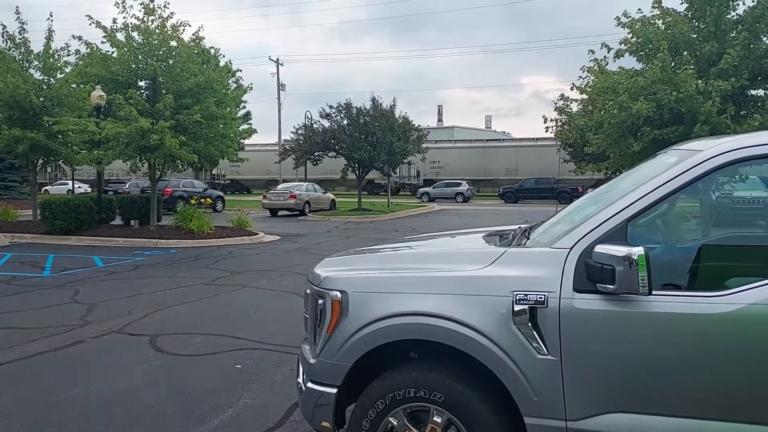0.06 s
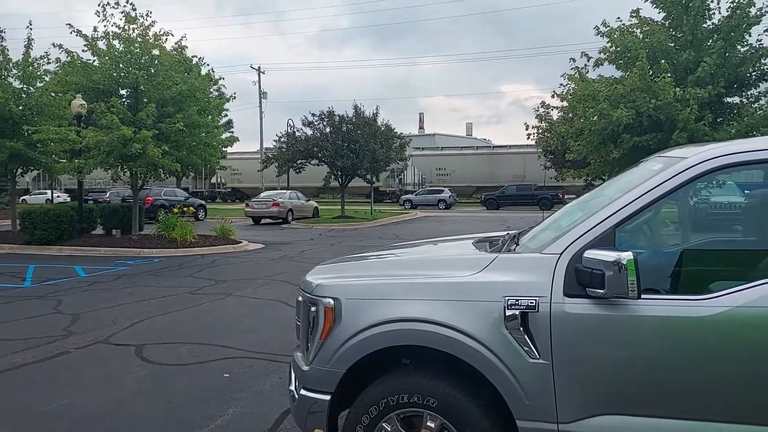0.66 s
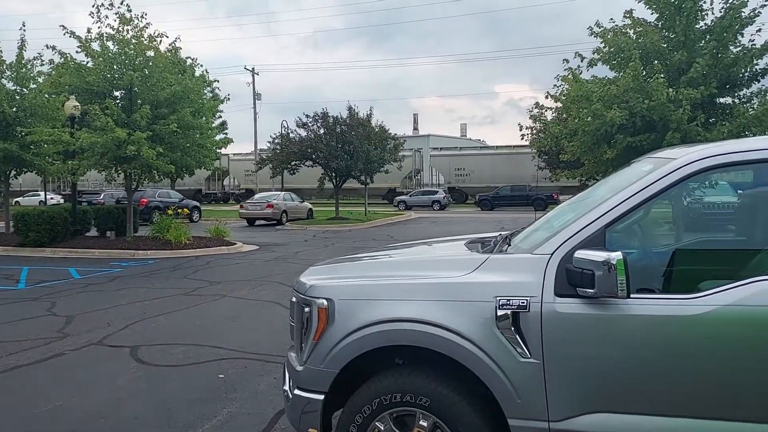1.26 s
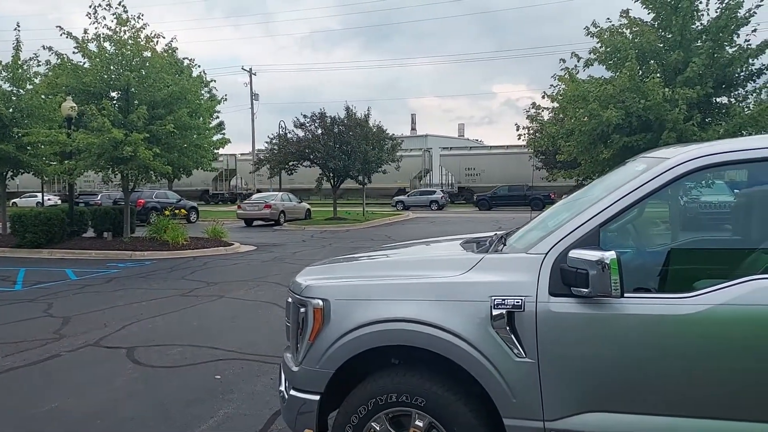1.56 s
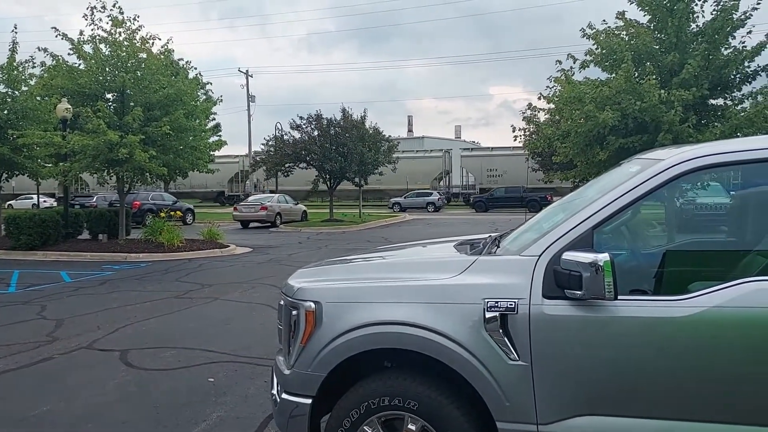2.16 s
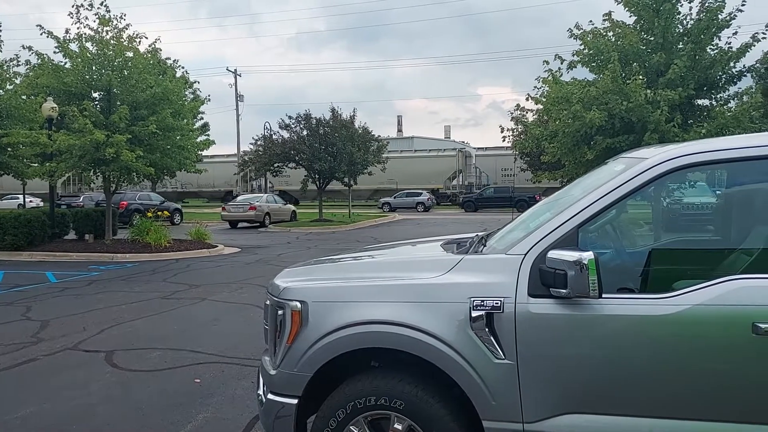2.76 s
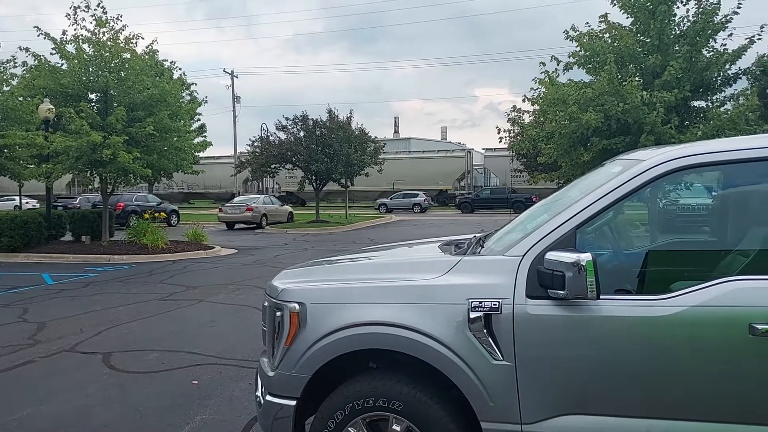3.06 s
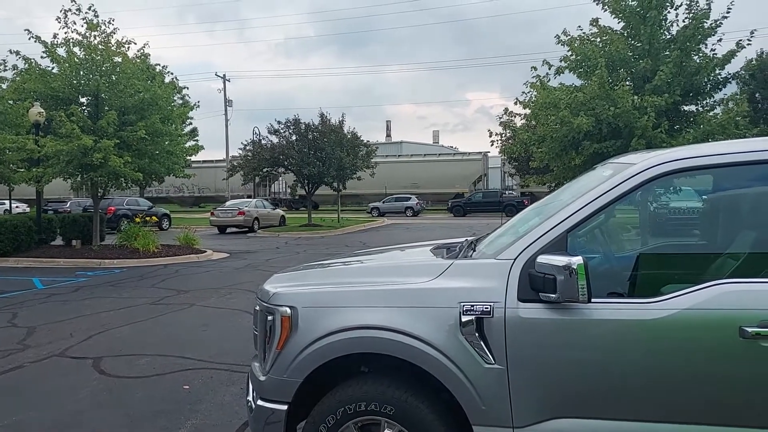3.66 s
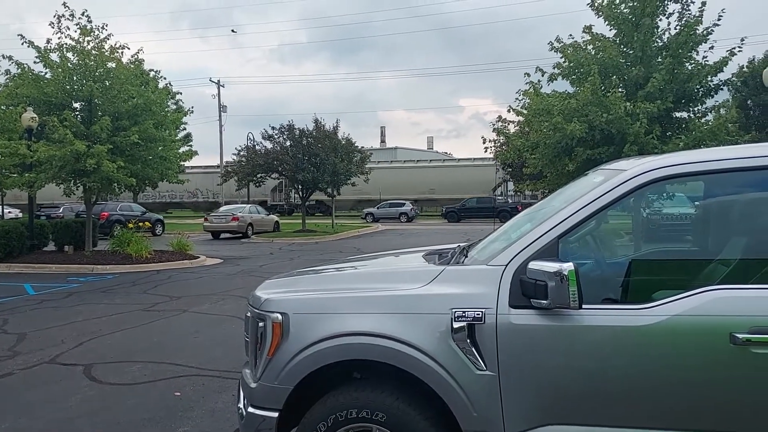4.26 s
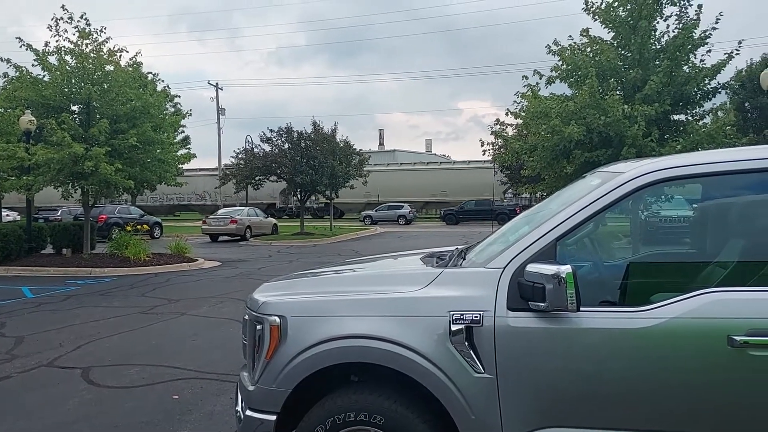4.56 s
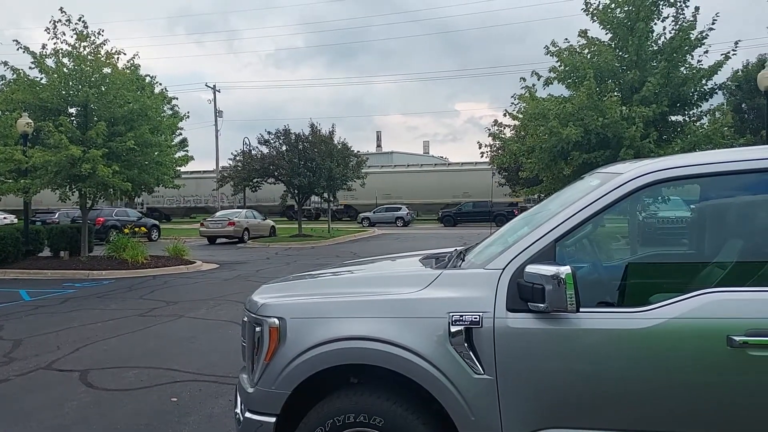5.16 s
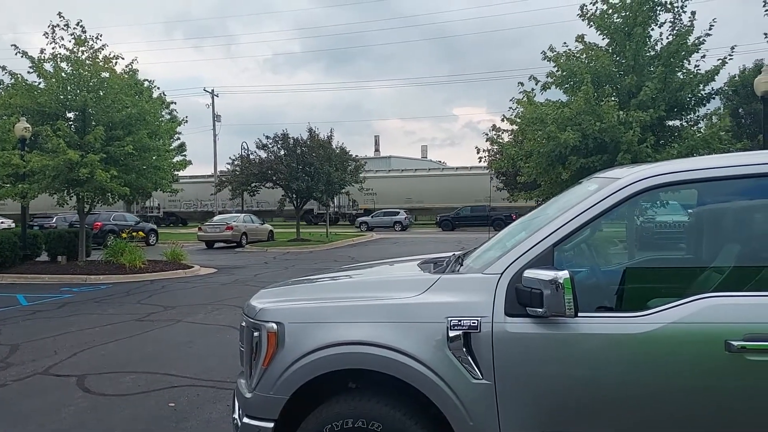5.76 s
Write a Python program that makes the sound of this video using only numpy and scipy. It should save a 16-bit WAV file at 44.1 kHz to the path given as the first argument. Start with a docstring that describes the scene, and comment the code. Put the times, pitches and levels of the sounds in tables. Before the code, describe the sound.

High, wavering wheel squeals come and go over the steady rumble of freight wagons passing beyond a car park.

```python
"""Wagons rumble and wheel flanges squeal as a freight train rolls by, heard from across a car park.
Two distant engine drones beat against each other. The flanges stick and slip on the rail, and their
wavering tones scatter off cars and buildings on the way to the stereo microphone. A thin hiss swells
and fades, with a few scuffs; later an insect ticks in the trees and loose metal clinks."""
import sys
import numpy as np
from scipy import signal
from scipy.fft import rfft, irfft
from scipy.io import wavfile
from scipy.ndimage import uniform_filter1d

SR = 44100
rng = np.random.default_rng(int(sys.argv[2]) if len(sys.argv) > 2 else 0)


def pcm_store(signal):
    """Save signal as 16-bit PCM."""
    levels = np.round(np.clip(np.atleast_2d(signal), -1, 1) * 32767)
    wavfile.write(sys.argv[1], SR, levels.astype(np.int16).T)


N = 256206
TIME = np.arange(N) / SR
FREQS = np.maximum(np.fft.rfftfreq(N, 1 / SR), 1)

# Wagons passing. Each row: time in seconds, then relative dB of body rumble, rail roar and wheel ring.
WAGON_LEVELS = [(0.0, -29, -51, -44.5), (0.05, -34.5, -45.5, -44.5), (0.94, -36, -45, -44.5),
                (1.15, -33.5, -44.5, -43.5), (2.1, -33.5, -42.5, -42.5), (3.19, -33, -46.5, -44.5),
                (3.75, -34, -42.5, -45), (4.22, -33, -47, -45.5), (4.27, -35, -47, -47.5),
                (4.95, -33, -45, -46), (5.53, -33.5, -42.5, -42), (5.81, -32.5, -40.5, -44)]
# Wagons knocking. Each row: start in seconds, peak in dB.
WAGON_KNOCKS = [(.62, -36), (1.265, -36), (3.65, -52), (4.655, -37)]
# The colours of the noises. Each row: frequency in Hz, relative spectral density in dB.
RUMBLE_COLOUR = [(20, -29), (35, -8.5), (50, -5), (64, 8.5), (100, 0), (125, 0), (165, -4), (225, 0.5),
                 (265, -1), (305, -2), (345, -6.5), (390, -10), (450, -10.5), (600, -30)]
ROAR_COLOUR = [(330, -33), (520, -1), (750, -0.5), (830, -5), (920, -5.5), (1010, -14.5), (1300, -32)]
RING_COLOUR = [(900, -12), (1100, -1.5), (1300, 2.5), (1410, -1), (1600, 0), (1920, 3), (2120, -0.5),
               (2330, -5), (2600, 0.5), (3200, -1.5), (3800, -31.5), (6000, -47)]
HISS_LOW_COLOUR = [(2400, 5.5), (3600, 9), (4300, 5.5), (4950, 5.5), (5900, 2.5), (7200, -7), (8400, -10),
                   (10000, -24)]
HISS_TOP_COLOUR = [(6000, 8), (8400, 5.5), (9400, 6.5), (10300, 3.5), (11300, 3.5), (12200, 3), (13700, 7),
                   (15700, -0.5)]
SCUFF_COLOUR = [(2000, -38), (3800, -22), (4400, 14), (4950, 11), (5400, -24), (6300, -6), (7500, -14),
                (15000, -9)]
GRIND_COLOUR = [(2700, -32), (2880, 8), (3050, -15), (3190, 12.5), (3290, -44), (3460, -29), (5200, -27),
                (5750, -9), (6400, -38), (7000, -39)]

# The two engines. Each row: time in seconds, relative dB of the main drone and of the second.
ENGINE_LEVELS = [(0, -44, -28), (.35, -25, -54), (.62, -25.5, -54), (.88, -35.5, -55), (1.25, -26, -58),
                 (1.53, -43, -49), (1.83, -31.5, -59), (2.25, -34, -46), (2.65, -25, -27.5),
                 (3.0, -29.5, -37), (3.36, -21, -37), (3.97, -28.5, -28), (4.3, -34, -40), (5.45, -22, -35),
                 (5.8, -31.5, -31)]
# The second engine hunts, so the beat quickens and slows. Each row: time in seconds, pitch in Hz.
HUNTING_PITCH = [(0, 84.7), (1.0, 84.5), (1.7, 83.3), (2.85, 84.6), (3.4, 84.1), (4.3, 84.95), (5.8, 84.2)]

# The wheels that sing. Each row: natural pitch in Hz, faint level between squeals in dB,
# rasp in dB against the mean of tone and octave, left minus right in dB.
SINGING_WHEELS = [(2650, -57, -23, 4), (2810, -49.5, -22.5, 0.5), (3130, -54.5, -25, 9)]
# A flange catches the rail. Each row: start and end in seconds; pitch, glide, mid-squeal bend and
# waver in Hz; level, change of level and octave level in dB.
FLANGE_CATCHES = [(-.05, 0.065, 2697, 11.5, -5, 11.7, -36.5, 5, -43),
                  (-.03, 0.219, 2790, 69, 14.5, 18.8, -41.5, 1, -44),
                  (0.277, 0.462, 2798, -24, 0, 6, -34.5, 0, -42.5),
                  (0.481, 0.673, 2784, 9, -0.5, 8.1, -37, 7, -38.5),
                  (.47, 0.59, 3160, -100, 9, 38, -33.5, 7, -63),
                  (0.71, 0.868, 2835, -31, 0, 11.4, -37, 0, -39),
                  (0.879, 1.02, 2895, 59.5, 1, 51, -39.5, -10, -49),
                  (0.661, 1.02, 3190, 218.5, -39.5, 71, -48.5, -2, -72),
                  (1.021, 1.198, 3190, -260, -10, 43.1, -43, 11, -73),
                  (1.163, 1.477, 2770, -9.5, -5.5, 8.5, -43.5, 0, -50),
                  (1.203, 1.396, 3095, -0.5, 0, 25.4, -42.5, 7, -68),
                  (1.551, 1.703, 2806, 29.5, 13, 3.1, -32, 0, -40),
                  (1.704, 2.039, 2800, -61.5, 34.5, 42.3, -40, -12, -49.5),
                  (1.727, 2.344, 3070, -45.5, -15.5, 31, -41.5, -9, -64),
                  (2.073, 2.32, 2690, 0.5, -38, 19, -36, 7, -49),
                  (2.342, 2.554, 2765, 1, 51.5, 5.4, -27, 8, -40.5),
                  (2.502, 2.65, 3095, 51, -0.5, 18.7, -36.5, -7, -57),
                  (2.553, 2.76, 2825, 16, 4.5, 24, -37, -7, -38.5),
                  (2.741, 3.064, 3147, 1.5, 0, 34, -41, 8, -76),
                  (2.829, 3.034, 2768, -29, -4.5, 8.1, -33, -4, -45.5),
                  (2.943, 3.2, 2685, -1, -15.5, 12.7, -37, 16, -56),
                  (3.181, 3.586, 2805, 1.5, 10, 10.4, -38, -10.5, -46.5),
                  (3.66, 3.927, 3136, -42, 3, 29, -43, 10, -78),
                  (3.964, 4.144, 2668, 30.5, -43, 10.7, -41, -4, -53),
                  (4.115, 4.504, 2825, 130.5, -25.5, 39.46, -41, 2.5, -50),
                  (4.221, 4.504, 3125, -17, 111, 70.4, -34, 1.5, -56),
                  (4.601, 5.0, 2822, 4, -9, 10.4, -42, -4, -50.5),
                  (4.611, 5.137, 3150, -18, 0.5, 43.9, -40.5, -2, -61),
                  (5.036, 5.361, 2828, 8, 1, 9.3, -39.5, -5, -45.5),
                  (5.198, 5.499, 3100, -61, -3.5, 29, -36, -12.5, -52.5),
                  (5.559, 5.904, 2658, -0.5, 1.5, 14, -37, 6, -54),
                  (5.62, 5.897, 3088, 13.5, 3.5, 23.1, -38.5, 5.5, -58)]
# A squeal's upper overtones. Each row: multiple of the pitch, relative level in dB, extra waver in Hz.
RASP_OVERTONES = [(3, -0.5, 78), (4, -2.5, 88), (5, -8, 60)]
# Swells of hiss. Each row: start, end and attack in seconds, relative dB of the low and top bands.
HISS_SWELLS = [(-.05, 0.656, .02, -48, -62), (0.653, .98, .05, -53.5, -63),
               (1.001, 1.526, 0.093, -51.5, -60), (1.546, 1.859, 0.15, -47, -52.5),
               (1.88, 2.126, 0.049, -55, -64), (2.357, 2.53, 0.0036, -50, -54),
               (2.877, 3.557, .08, -51, -60.5), (3.12, 3.28, 0.066, -51, -57), (4.29, 4.323, .03, -56, -51),
               (4.616, 4.93, 0.035, -55, -68), (5.365, 5.9, 0.038, -46.5, -59)]
# Short scuffs. Each row: start in seconds, peak in dB.
SCUFF_PEAKS = [(.03, -35), (.18, -41), (4.003, -56), (4.321, -43)]
# Brief squeaks. Each row: centre in seconds, pitch in Hz, level in dB, octave level in dB.
FLANGE_TOUCHES = [(0.691, 2540, -38, -66), (1.489, 2500, -39, -66), (2.079, 3320, -41, -66),
                  (2.955, 2624, -31, -41), (3.16, 2610, -34.5, -49), (4.04, 3730, -45, -70),
                  (5.022, 2480, -40, -64)]
# A flange grinds hard. Each row: start and end in seconds, level in dB.
FLANGE_GRINDS = [(.78, 1.05, -44.5), (1.72, 1.911, -57), (2.583, 3.255, -41.5), (4.28, 4.482, -35),
                 (4.704, 4.951, -40), (4.968, 5.329, -37)]
# The insect's ticks. Each row: start in seconds, peak in dB.
WING_STROKES = [(3.69, -37), (3.713, -39), (4.235, -47), (4.258, -45), (5.464, -42), (5.485, -40)]
# Loose metal clinking. Each row: start in seconds, strength in dB.
METAL_HITS = [(5.38, -43.5), (5.41, -48), (5.455, -45), (5.492, -40.5), (5.551, -40.5), (5.571, -44.5),
              (5.603, -41.5), (5.635, -38.5), (5.722, -37.5), (5.748, -50)]
# The metal's modes. Each row: frequency in Hz, gain in dB, seconds to die away by 60 dB.
METAL_MODES = [(3675, -17, 0.07), (4710, 6, 0.03), (4910, 3.5, 0.06), (5270, 1, 0.055), (5150, -2, .08),
               (5900, -7, .09), (5800, -6.5, 0.39), (6240, -16, 0.11), (6630, -5, 0.15), (8480, -13, 0.11),
               (9150, -14, 0.17), (10000, -19, 0.086), (10680, -17, 0.11), (14600, -10, .04)]

# Noise at the microphone. Each row: frequency in Hz, left-right correlation from 0 to 1.
STEREO_LIKENESS = [(30, 1), (60, 0.4), (130, 1), (290, 0.83), (640, 0.34), (1400, 0.14), (3000, 0)]
# The side that noise leans to. Each row: frequency in Hz, left minus right in dB.
STEREO_BALANCE = [(60, -3.5), (110, 0), (200, 0), (380, -0.5), (700, 2.5), (1290, 5), (2380, 3.5),
                  (4400, 3), (8120, 0), (15000, 0.5)]
# The microphone's ports. Each row: frequency in Hz, radians by which left leads.
MIC_PORT_PHASE = [(25, -0.35), (75, -0.91), (130, -1.16), (250, 0.081)]


def from_db(db):
    """Decibels to gain."""
    return 10 ** (np.asarray(db) / 20)


def to_db(power):
    """Power to decibels."""
    return 10 * np.log10(power + 1e-12)


def unit_rms(x):
    """Scale to unit rms."""
    return x / np.sqrt(np.mean(x ** 2) + 1e-20)


def over_time(rows):
    """Each column of a timed table, read at every sample."""
    times, *columns = np.transpose(rows)
    return [np.interp(TIME, times, column) for column in columns]


def over_hz(points):
    """A table read along a log-frequency axis."""
    hz, value = np.transpose(points)
    return np.interp(np.log(FREQS), np.log(hz), value)


def panned(left_db):
    """Left and right gains for a level difference."""
    return from_db(np.array([[.5], [-.5]]) * left_db)


def drift(rate_hz):
    """A random wander of unit rms, mostly slower than the given rate."""
    return unit_rms(irfft(rfft(rng.standard_normal(N)) / (1 + (FREQS / rate_hz) ** 4), N))


def noise(colour):
    """Coloured stereo noise, alike on both sides only in the bass, falling steeply outside its table."""
    mid, side = rfft(rng.standard_normal((2, N)))
    alike = over_hz(STEREO_LIKENESS)
    pair = np.sqrt(1 + alike) * mid + np.sqrt(1 - alike) * side * [[1], [-1]]
    edges = np.minimum(1, FREQS / colour[0][0]) ** 4 * np.minimum(1, colour[-1][0] / FREQS) ** 4
    return unit_rms(irfft(pair * edges * from_db(over_hz(colour)) * panned(over_hz(STEREO_BALANCE)), N))


def bursts(events, rise_s, decay_s):
    """One envelope that jumps and dies away at each event."""
    out = np.zeros(N)
    for start, level_db in events:
        age = np.maximum(TIME - start, 0)
        decay = np.exp(-np.clip((age - rise_s) / decay_s, 0, 20))
        out += from_db(level_db) * np.minimum(age / rise_s, 1) * decay
    return out


def swell(start, end, attack_s, release_s):
    """Attack, hold and release with rounded corners."""
    return (1 + np.tanh((TIME - start) / attack_s)) * (1 + np.tanh((end - TIME) / release_s)) / 4 + 1e-9


def wagons():
    """Beyond the car park, rough wheels shake the wagon bodies, the rails and the wheels themselves."""
    rumble_db, roar_db, ring_db = over_time(WAGON_LEVELS)
    knocks = bursts(WAGON_KNOCKS, rise_s=0.006, decay_s=0.006)
    rumble = from_db(rumble_db + 4.0) * noise(RUMBLE_COLOUR)
    roar = (from_db(roar_db + 2.0 + 1.45 * drift(9.8)) + knocks) * noise(ROAR_COLOUR)
    ring = from_db(ring_db + 4.5 + 0.78 * drift(10)) * noise(RING_COLOUR)
    return rumble + roar + ring


def drone(hz, level_db, crest_s):
    """An exhaust note from afar: only the firing tone reaches the microphone."""
    turns = np.cumsum(hz * np.ones(N)) / SR
    turns -= np.interp(crest_s, TIME, turns)
    return from_db(level_db) * np.sqrt(2) * np.cos(2 * np.pi * turns)


def engines(main_hz=74.8, in_step_s=3.335):
    """One engine holds its speed; a second, about ten hertz higher, throbs against it."""
    main_db, second_db = over_time(ENGINE_LEVELS)
    second_hz, = over_time(HUNTING_PITCH)
    both = drone(main_hz, main_db, in_step_s) + drone(second_hz, second_db, in_step_s)
    return from_db(-1.03) * both * panned(-2.8)


def scattered(tone, t60_s, echo_db):
    """Echoes off cars and buildings make a wavering tone flutter; its slow level stays at 1."""
    age = TIME[:SR // 2]
    paths = rng.standard_normal((2, len(age))) * from_db(-60 * age / t60_s)
    paths *= from_db(echo_db) / np.sqrt(np.sum(paths ** 2, axis=1, keepdims=True))
    paths[:, 0] += 1  # the direct path
    heard = signal.oaconvolve(tone[None], paths, axes=1)[:, :N]
    return heard / np.sqrt(uniform_filter1d(heard ** 2, size=SR // 10, axis=1) + 1e-6)


def wheel_curves(catches, faint_db, octave_growth_db=6.5):
    """Pitch, waver, level and octave level of one wheel, which sings on faintly between squeals."""
    grip = pitch = waver = 0
    power, octave_power = from_db(faint_db) ** 2, from_db(faint_db - 18) ** 2
    for start, end, hz, glide_hz, bend_hz, waver_hz, level_db, change_db, octave_db in catches:
        held = swell(start, end, attack_s=0.022, release_s=0.04) ** 2
        progress = np.clip((TIME - start) / (end - start), 0, 1) - .5  # zero in mid-squeal
        grip += held
        pitch += held * (hz + glide_hz * progress + bend_hz * np.cos(np.pi * progress))
        waver += held * waver_hz
        power += held * from_db(level_db + change_db * progress) ** 2
        octave_power += held * from_db(octave_db + (change_db + octave_growth_db) * progress) ** 2
    return pitch / grip, waver / grip, to_db(power), to_db(octave_power)


def stick_slip(hz, waver_hz, level_db, octave_db, rasp_db, left_db):
    """Stick-slip drives one wheel mode; its pitch wavers, and its upper overtones blur into a rasp."""
    phase = 2 * np.pi * np.cumsum(hz + waver_hz * drift(140) + 5 * drift(22)) / SR
    tones = [(from_db(level_db) * panned(left_db), phase), (from_db(octave_db) * panned(-1.2), 2 * phase)]
    for multiple, overtone_db, blur_hz in RASP_OVERTONES:
        blur = 2 * np.pi * np.cumsum(blur_hz * drift(200)) / SR
        flare_db = 3 * drift(10)
        gain = from_db((level_db + octave_db) / 2 + rasp_db + overtone_db + flare_db)
        tones.append((gain, multiple * phase + blur))
    partials = sum(gain * scattered(np.sin(angle), t60_s=0.26, echo_db=3) for gain, angle in tones)
    return partials * from_db(2.0 * drift(40))


def squeals():
    """Each time a flange catches the rail, the wheel nearest in pitch sings."""
    out = np.zeros((2, N))
    natural_hz = np.array(SINGING_WHEELS)[:, 0]
    for wheel, (_, faint_db, rasp_db, left_db) in enumerate(SINGING_WHEELS):
        catches = [row for row in FLANGE_CATCHES if np.argmin(abs(natural_hz - row[2])) == wheel]
        out += stick_slip(*wheel_curves(catches, faint_db), rasp_db, left_db)
    return out


def hiss():
    """A thin rustling hiss in two bands swells above a steady floor."""
    low_power, top_power = from_db(-53.5) ** 2, from_db(-65) ** 2
    for start, end, attack_s, low_db, top_db in HISS_SWELLS:
        shape = swell(start, end, attack_s, release_s=0.11)
        low_power += (from_db(low_db) * shape) ** 2
        top_power += (from_db(top_db) * shape) ** 2
    grain = drift(82) + drift(9.9)
    low = from_db(to_db(low_power) + 5.5 + 0.89 * grain) * noise(HISS_LOW_COLOUR)
    top = from_db(to_db(top_power) + 6.5 + 0.74 * grain) * noise(HISS_TOP_COLOUR)
    return low + top


def scuffs():
    """Short, bright puffs of noise."""
    return bursts(SCUFF_PEAKS, rise_s=0.0022, decay_s=0.017) * noise(SCUFF_COLOUR)


def squeaks(half_width_s=0.013):
    """Off to the left, a flange touches the rail for a moment."""
    out = np.zeros((2, N))
    waver_hz = 20 * drift(136)
    for centre, hz, level_db, octave_db in FLANGE_TOUCHES:
        phase = 2 * np.pi * np.cumsum(hz + waver_hz) / SR
        tone = from_db(level_db) * np.sin(phase) + from_db(octave_db) * np.sin(2 * phase)
        touch = np.exp(-np.minimum(((TIME - centre) / half_width_s) ** 2, 30))
        out += tone * touch * panned(7.7)
    return out


def grinding():
    """A flange pressed hard on the rail grinds in narrow bands of noise."""
    pressure = sum(from_db(level_db) * swell(start, end, attack_s=0.058, release_s=0.15)
                   for start, end, level_db in FLANGE_GRINDS)
    return pressure * from_db(1.5 * drift(50)) * noise(GRIND_COLOUR)


def insect():
    """In the trees, a little to the left, paired wing strokes ring a narrow resonance in the treble."""
    wing = noise([(12000, -30), (12900, 4), (13500, 5), (14000, -10), (14700, -25)])
    return bursts(WING_STROKES, rise_s=0.0021, decay_s=0.0083) * wing * panned(3.0)


def clinks(rattle_s=0.0046):
    """Each clink is a short rattle of contacts that sets the loose metal's modes ringing."""
    contacts = bursts(METAL_HITS, rise_s=0.0021, decay_s=rattle_s) / np.sqrt(rattle_s * SR / 2)
    out = np.zeros((2, N))
    for hz, gain_db, t60_s in METAL_MODES:
        radius, angle = from_db(-60 / (t60_s * SR)), 2 * np.pi * hz / SR
        push = contacts * rng.standard_normal((2, N))
        ring = signal.lfilter([0, np.sin(angle)], [1, -2 * radius * np.cos(angle), radius ** 2], push)
        out += from_db(gain_db) * ring
    return out


def scene():
    """The train and the small treble sounds, as they arrive across the car park."""
    return wagons() + engines() + squeals() + hiss() + scuffs() + squeaks() + grinding() + insect() + clinks()


def record(dry):
    """The microphone's ports put left and right out of step in the bass; the top is cut steeply."""
    cutoff_hz = 15750
    ports = np.exp(np.array([[.5j], [-.5j]]) * over_hz(MIC_PORT_PHASE))
    top_cut = 1 / np.sqrt(1 + (FREQS / cutoff_hz) ** 600)
    return irfft(rfft(dry) * ports * top_cut, N)


dry = scene()
out = record(dry)
pcm_store(out)
```